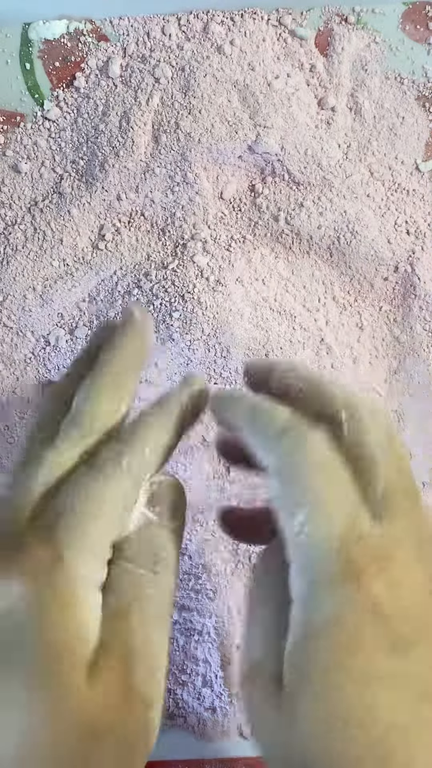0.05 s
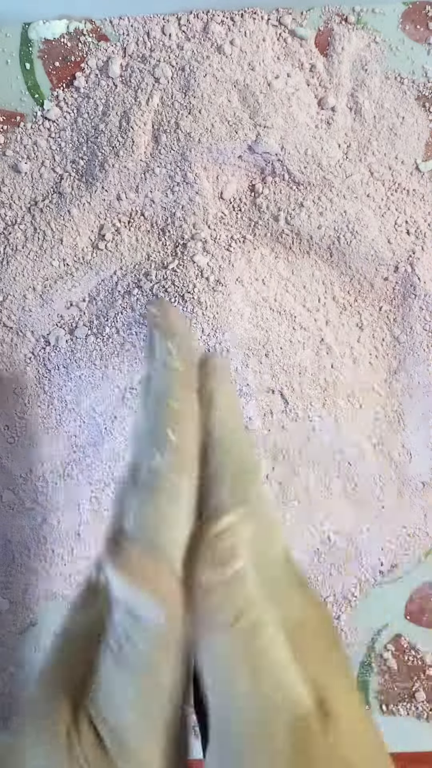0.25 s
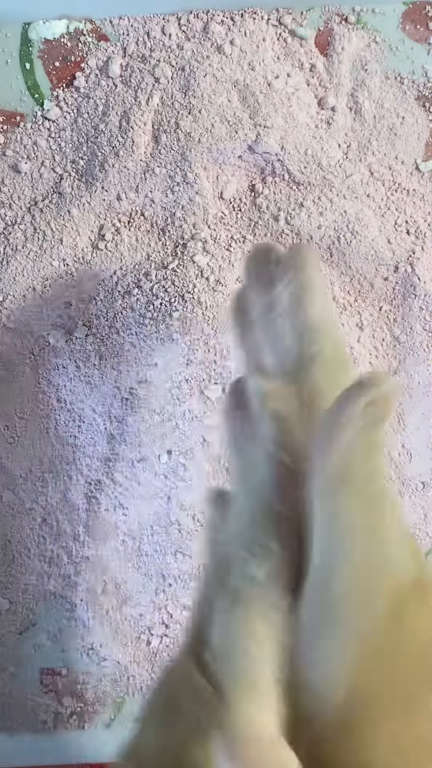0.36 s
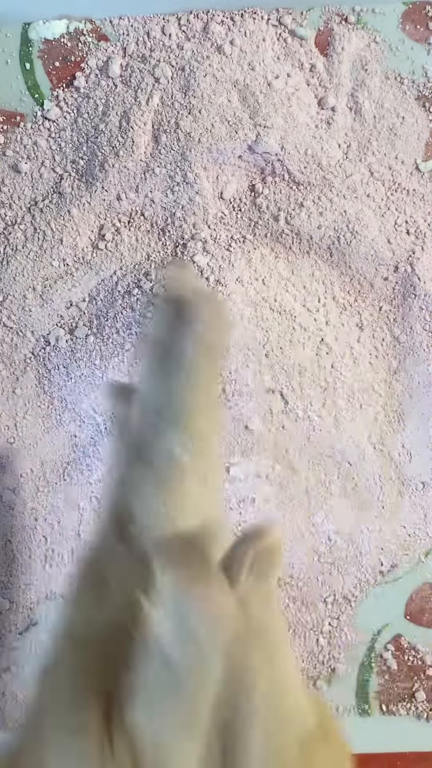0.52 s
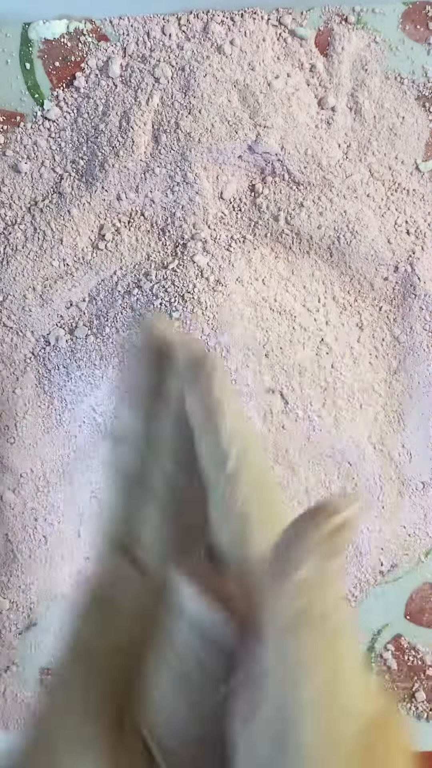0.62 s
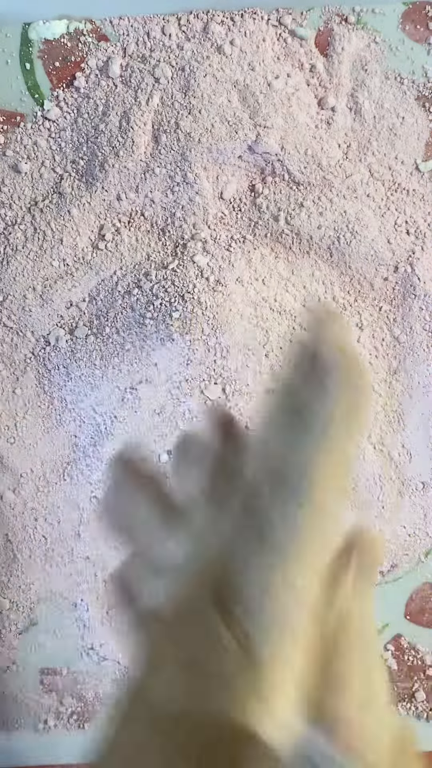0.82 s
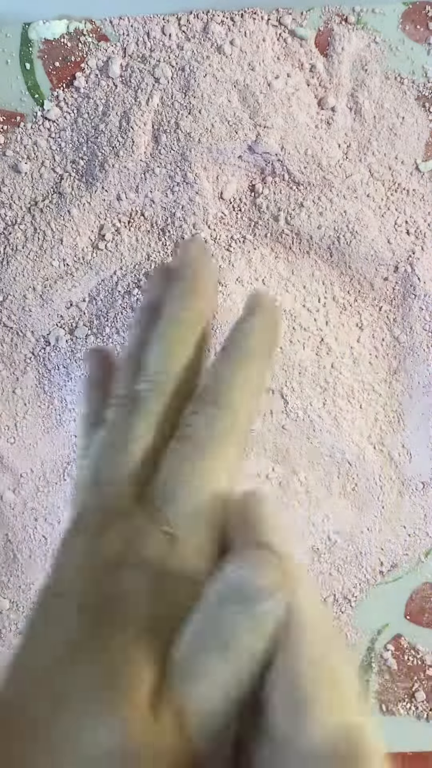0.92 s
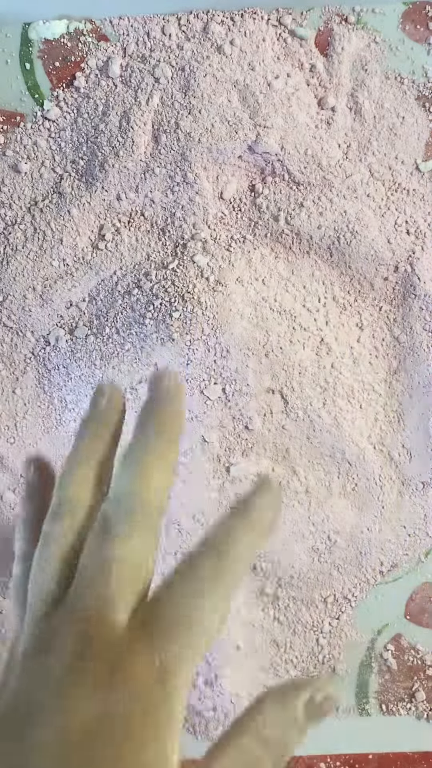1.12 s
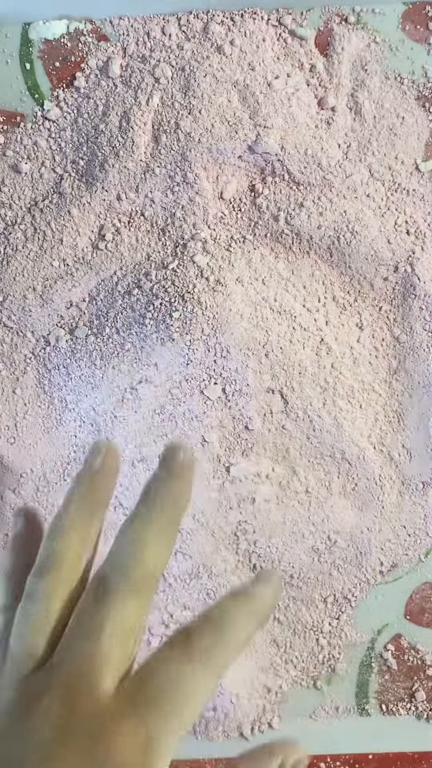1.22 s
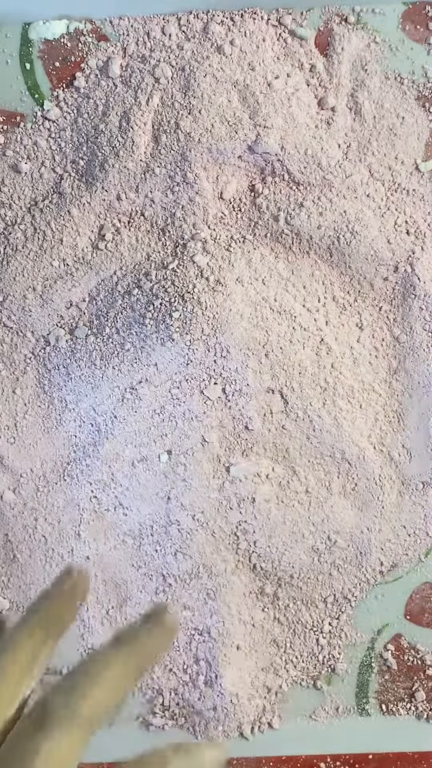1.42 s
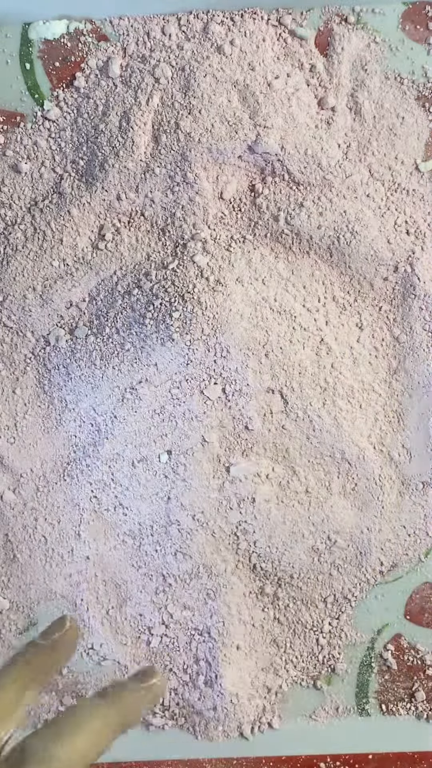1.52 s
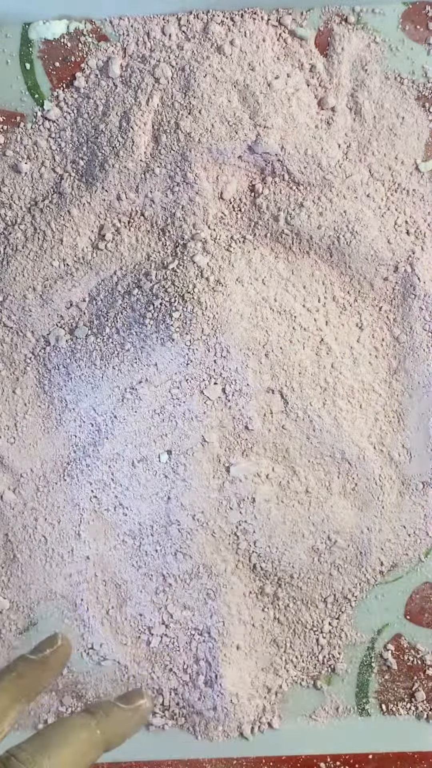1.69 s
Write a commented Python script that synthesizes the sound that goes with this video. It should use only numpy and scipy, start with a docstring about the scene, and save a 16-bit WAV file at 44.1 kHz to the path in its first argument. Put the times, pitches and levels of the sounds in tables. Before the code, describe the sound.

Dry hands coated in powder rub together up close in a quiet room: a light brush and a tiny crumb snap, then four quick hissing strokes. They separate, leaving a faint cloth rustle and one soft low bump.

```python
"""Two powder-covered palms brush together, rub back and forth four times and part, close by.
Friction shears fine grains between the skins into a dry hiss; the hollow between the palms
is a cavity resonator, ringing higher as it narrows. The hands displace puffs of air, a crumb
snaps, the skin sticks and slips, and the sleeves rustle as the arms withdraw.
Behind lies a quiet room with a faint whine; a soft low bump comes at the end."""
import sys
import numpy as np
from scipy import signal
from scipy.fft import rfft, irfft, next_fast_len
from scipy.io import wavfile
from scipy.ndimage import uniform_filter1d, map_coordinates

SR = 44100
rng = np.random.default_rng(int(sys.argv[2]) if len(sys.argv) > 2 else 0)


def bounce(signal):
    """Save signal as a 16-bit WAV file at the path given by the first command-line argument."""
    frames = np.transpose(np.atleast_2d(signal))
    limited = np.clip(frames, -1, 1)
    pcm = np.round(limited * 32767).astype(np.int16)
    wavfile.write(sys.argv[1], SR, pcm)


N = 77175

# Rubbing loudness through the first brush and four strokes: t/s, skin level/dB, hollow level/dB
STROKE_LEVELS = [
    [(0.0, -36, -51), (0.026, -39, -48), (0.07, -53, -55), (0.09, -42.5, -52), (0.108, -48, -50.5)],
    [(0.135, -47, -50.5), (0.165, -53.5, -54.5), (0.225, -31, -46), (0.247, -33, -44.5), (0.273, -30, -34),
     (0.295, -27, -32)],
    [(0.31, -30, -28), (0.332, -24.5, -32.5), (0.405, -30.5, -37.5)],
    [(0.415, -30, -36), (0.425, -25, -29.5), (0.459, -23, -35), (0.477, -27, -31.5), (0.525, -21.5, -32),
     (0.541, -28, -35), (0.6, -27, -32.5)],
    [(0.61, -30, -33.5), (0.644, -23.5, -27), (0.676, -27, -34.5), (0.686, -26.5, -30.5), (0.726, -28, -32),
     (0.736, -29.5, -34), (0.755, -27, -35.5)],
    [(0.762, -24.5, -31.5), (0.788, -27, -37.5), (0.806, -24, -30)],
    [(0.82, -20.5, -33), (0.84, -22.5, -44.5), (0.878, -24.5, -49), (0.885, -26, -55)],
    [(0.893, -30.5, -43), (0.907, -34, -34.5), (0.953, -30.5, -52.5), (0.97, -58, -60)],
]
# Spectrum of the skin hiss: f/Hz, relative level/dB
SKIN_SPECTRUM = [(300, -31), (900, -25.5), (1400, -18.5), (1650, -14.5), (2000, -17.5), (2600, -13.5),
                 (3500, -9.5), (4800, -4), (6200, -0.5), (7400, -3), (9000, -0.5), (11000, -3.5),
                 (13500, -6.5), (15500, -15)]
# Centre of the sheen, a moving bright band in the hiss: t/s, f/Hz
SHEEN_CENTRE = [(0, 6640), (.1, 5800), (.22, 8240), (.275, 6000), (.335, 8300), (.39, 6640), (.48, 6500),
                (.54, 7440), (.6, 5900), (.68, 6600), (.78, 6250), (.815, 5600), (.84, 8200), (.875, 9400),
                (.912, 6500), (.95, 8160)]
# Resonance of the hollow between the palms: t/s, f/Hz
HOLLOW_RESONANCE = [(0, 3700), (.22, 4500), (.275, 3780), (.31, 3170), (.326, 3840), (.365, 3180),
                    (.4, 3400), (.425, 2800), (.445, 3040), (.472, 2550), (.503, 2900), (.525, 4350),
                    (.555, 3700), (.61, 3560), (.645, 2920), (.67, 3060), (.708, 3900), (.733, 2480),
                    (.765, 2980), (.8, 3030), (.82, 3900), (.87, 4200), (.903, 2640), (.925, 3680),
                    (.96, 3860)]
# Response of the hollow: distance from resonance/octaves, relative level/dB
HOLLOW_RESPONSE = [(-1.5, -22.5), (-1.5, -15.5), (-1.12, -13), (-.5, -7.5), (0.28, -0.5), (0, 8.5),
                   (0.1, -2), (.6, -7.5), (0.86, -26)]
# Constant tone of the rub, dipping near 1 kHz, brighter above 1.6 kHz: f/Hz, relative level/dB
HOLLOW_COLOUR = [(600, -1.5), (1000, -8.5), (1400, -7), (1680, 2), (2000, 3.5), (2600, 4)]
# Reverberation time of the room: f/Hz, T60/s
REVERB_TIMES = [(200, 0.86), (1800, 0.64), (4000, 0.64), (7000, 0.44), (14000, 0.27)]
# Spectrum of the room noise: f/Hz, relative level/dB
ROOM_SPECTRUM = [(25, -1), (60, -4.5), (130, -10), (185, 3), (240, -5), (380, -3), (650, -7.5), (1000, -14),
                 (1700, -18), (2500, -23), (3900, -19), (5500, -23.5), (9000, -25), (15000, -31.5)]
# Air pushed out by the hands: t/s, level/dB, Gaussian width/s
AIR_PUFFS = [(0.032, -59, 0.016), (0.143, -58.5, .012), (0.208, -44.5, .011), (0.498, -56.5, 0.013),
             (0.568, -37, 0.018), (0.684, -56.5, 0.018), (0.854, -60, 0.042), (0.906, -43.5, 0.0083),
             (0.945, -45.5, 0.01)]
# Spectrum of a puff: f/Hz, relative level/dB
PUFF_SPECTRUM = [(15, -15.5), (40, -2.5), (85, 0), (130, -6.5), (220, -24), (600, -32)]
# Modes of a snapping crumb: f/Hz, level/dB, T60/s
CRUMB_MODES = [(790, -42, 0.0065), (1710, -33.5, 0.0021), (3820, -30.5, 0.0019), (7000, -20.5, .0012)]
# Skin catching and slipping: t/s, level/dB, f/Hz, Gaussian width/s
SKIN_SLIPS = [(.43, -28, 5930, 0.0017), (0.515, -23, 5100, .002), (.8145, -20, 5550, 0.0015),
              (0.874, -23.5, 9000, 0.0024), (0.909, -31, 6260, .004), (0.948, -33.5, 8100, 0.0016)]
# Rustles as the arms draw back in turn: t/s, level/dB, Gaussian width/s
SLEEVE_SWISHES = [(1.074, -59.5, 0.063), (1.226, -54.5, 0.068), (1.38, -65.5, 0.064), (1.54, -57, 0.039)]
# Spectrum of sliding cloth: f/Hz, relative level/dB
CLOTH_SPECTRUM = [(500, -27), (1250, -7.5), (1600, 0.5), (2200, 0), (3000, -1), (3400, -6), (3800, -2),
                  (5200, -11), (8000, -16), (14000, -39)]


def amp(db):
    """Amplitude ratio of a level in decibels."""
    return 10 ** (np.asarray(db) / 20)


def unit(x):
    """Normalisation to rms 1."""
    return x / np.sqrt(np.mean(x ** 2) + 1e-20)


def clock():
    """Sample times in seconds."""
    return np.arange(N) / SR


def along(points, hz):
    """Interpolation of (f/Hz, value) points on a logarithmic frequency axis."""
    freqs, values = np.transpose(points)
    return np.interp(np.log(hz + 1), np.log(freqs + 1), values)


def curve(rows, at):
    """Linear interpolation of a two-column table."""
    return np.interp(at, *np.transpose(rows))


def wobble(knots_per_s):
    """Smooth random modulation: a spline through Gaussian values."""
    return map_coordinates(rng.standard_normal(N // 8), [clock() * knots_per_s], mode="wrap")


def bell(distance, width):
    """A Gaussian of height 1."""
    return np.exp(-.5 * (distance / width) ** 2)


def filtered(x, response):
    """Linear filtering: the spectrum of x times a frequency response."""
    size = next_fast_len(N + SR // 2)
    return irfft(rfft(x, size) * response(np.fft.rfftfreq(size, 1 / SR)), size)[..., :N]


def noise(spectrum):
    """Spectral shaping of white noise, at rms 1."""
    return unit(filtered(rng.standard_normal(N), lambda hz: amp(along(spectrum, hz))))


def swept(x, colour_db, patchy_db=1.92):
    """Time-varying filtering at constant power, with random patches in the spectrum."""
    hz, t, spectra = signal.stft(x, SR, nperseg=512, noverlap=384)
    patches = unit(uniform_filter1d(uniform_filter1d(rng.standard_normal(spectra.shape), 7, 0), 8, 1))
    gain = amp(colour_db(hz[:, None] + 1, t) + patchy_db * patches)
    gain = gain / np.linalg.norm(gain, axis=0)
    return unit(signal.istft(spectra * gain, SR, nperseg=512, noverlap=384)[1][:N])


def grit(grains_per_s=7000, spread_db=3, grain_share=0.27):
    """Shot noise: clicks of shearing grains add in power to the smooth hiss of the finest dust."""
    hits = rng.random(N) < grains_per_s / SR
    grains = unit(hits * rng.choice([-1, 1], N) * amp(spread_db * rng.standard_normal(N)))
    dust = rng.standard_normal(N)
    return np.sqrt(grain_share) * grains + np.sqrt(1 - grain_share) * dust


def skin_hiss(sheen_db=3, sheen_octaves=0.18):
    """Friction noise: powder shearing on skin gives a broad hiss with a moving bright band."""
    def colour_db(hz, t):
        octaves = np.log2(hz / curve(SHEEN_CENTRE, t))
        return along(SKIN_SPECTRUM, hz) + sheen_db * bell(octaves, sheen_octaves)
    return swept(grit(), colour_db)


def palm_hollow():
    """Cavity resonance: friction noise excites the hollow, whose pitch rises as it narrows."""
    def colour_db(hz, t):
        octaves = np.log2(hz / curve(HOLLOW_RESONANCE, t))
        return curve(HOLLOW_RESPONSE, octaves) + along(HOLLOW_COLOUR, hz)
    return swept(grit(), colour_db)


def rubbing(judder_db=0.57, release_db_per_s=896):
    """Amplitude modulation: hiss and hollow follow the strokes, judder together and die on parting."""
    t = clock()
    times, skin_db, hollow_db = np.vstack(STROKE_LEVELS).T
    skin = amp(np.interp(t, times, skin_db)) * skin_hiss()
    hollow = amp(np.interp(t, times, hollow_db)) * palm_hollow()
    since_parting = np.maximum(t - times[-1], 0)
    contact = amp(judder_db * wobble(knots_per_s=320) - release_db_per_s * since_parting)
    return contact * (skin + hollow)


def reverberation(x):
    """Diffuse reflection: the walls return an exponential tail whose treble dies first."""
    hz, t, spectra = signal.stft(rng.standard_normal(SR // 2), SR, nperseg=256)
    decay = amp(-60 * t / along(REVERB_TIMES, hz)[:, None])
    tail = signal.istft(spectra * decay, SR, nperseg=256)[1]
    return signal.fftconvolve(x, tail / np.linalg.norm(tail))[:N]


def background(noise_db=-54.5, whine_hz=4650, waver_hz=3.3, whine_start_db=-75.5, rise_db_per_s=7.5):
    """Stationary room noise under a thin, frequency-modulated whine that slowly grows."""
    phase = 2 * np.pi * np.cumsum(whine_hz + waver_hz * wobble(knots_per_s=41)) / SR
    whine = amp(whine_start_db + rise_db_per_s * clock()) * np.sin(phase)
    return amp(noise_db) * noise(ROOM_SPECTRUM) + whine


def air_puffs():
    """Air displacement: the moving palms send low pressure pulses to the microphone."""
    out = np.zeros(N)
    for centre, db, width in AIR_PUFFS:
        envelope = bell(clock() - centre, width)
        air = envelope * noise(PUFF_SPECTRUM)
        out += amp(db) * air * np.linalg.norm(envelope) / np.linalg.norm(air)
    return out


def crumb_snap(onset_s=0.1233):
    """Impulse response: a crumb of powder snaps between the fingers and rings in damped modes."""
    age = np.maximum(clock() - onset_s, 0)
    return sum(amp(db - 60 * age / t60) * np.sin(2 * np.pi * hz * age) for hz, db, t60 in CRUMB_MODES)


def skin_slips(width_octaves=0.22):
    """Stick-slip friction: the skin catches and lets go in brief narrow-band rasps."""
    out = np.zeros(N)
    for centre, db, pitch_hz, width in SKIN_SLIPS:
        white = rng.standard_normal(N)
        rasp = unit(filtered(white, lambda hz: bell(np.log2((hz + 1) / pitch_hz), width_octaves)))
        out += amp(db) * bell(clock() - centre, width) * rasp
    return out


def sleeves():
    """Sliding friction: cloth swishes softly after the hands have parted."""
    return sum(amp(db) * bell(clock() - centre, width) * noise(CLOTH_SPECTRUM)
               for centre, db, width in SLEEVE_SWISHES)


def bump(centre_s=1.731, peak_db=-35, pitch_hz=185, half_length_s=0.0078):
    """A tone burst: a few cycles under a flat-topped window are heard as a soft low bump."""
    offset = clock() - centre_s
    window = np.exp(-(offset / half_length_s) ** 4)
    return amp(peak_db) * window * np.sin(2 * np.pi * pitch_hz * offset)


def scene(reverb_db=-18):
    """Superposition of direct sound, reverberation and background, alike in both channels."""
    hands = rubbing() + skin_slips() + crumb_snap() + sleeves()
    mono = hands + amp(reverb_db) * reverberation(hands) + air_puffs() + bump() + background()
    return np.array([mono, mono])


def record(dry, cutoff_hz=15750):
    """Band limiting: an ideal low-pass filter passes nothing above its cutoff."""
    return filtered(dry, lambda hz: hz < cutoff_hz)


dry = scene()
out = record(dry)
bounce(out)
```